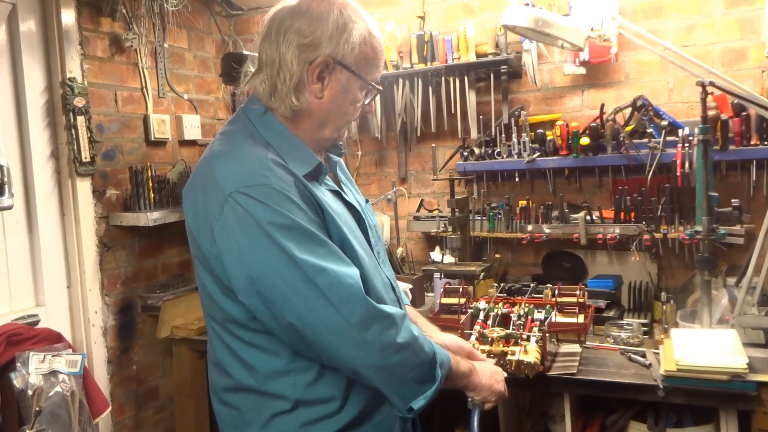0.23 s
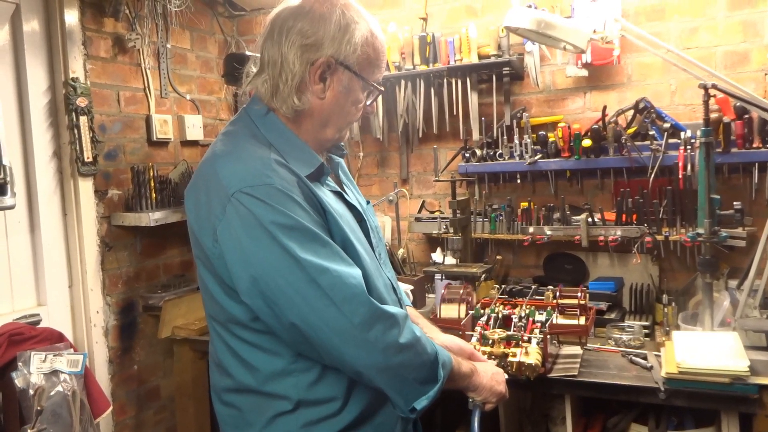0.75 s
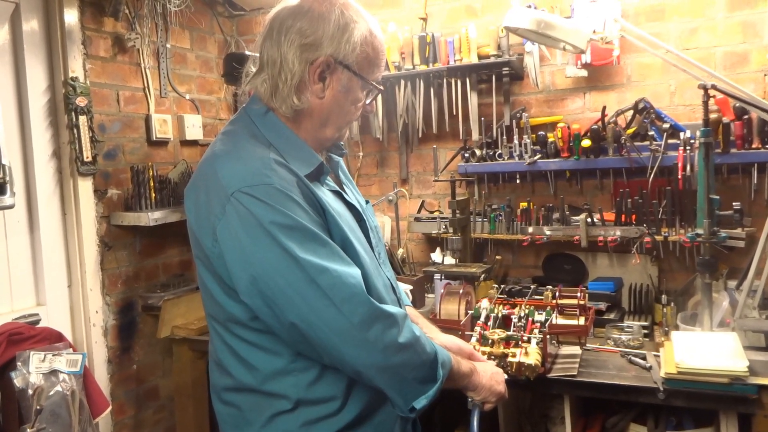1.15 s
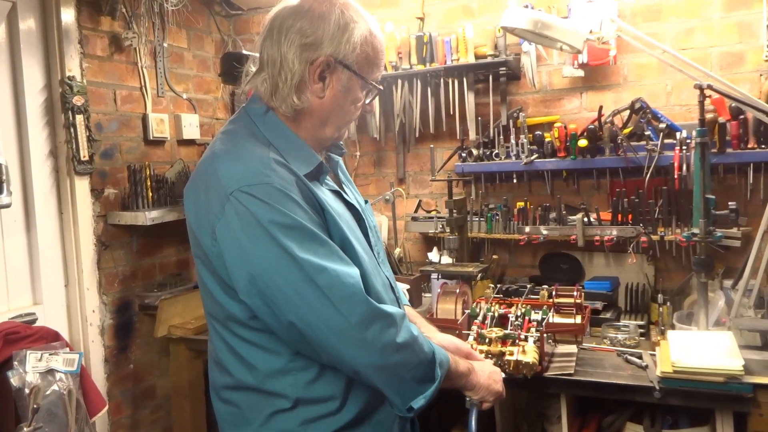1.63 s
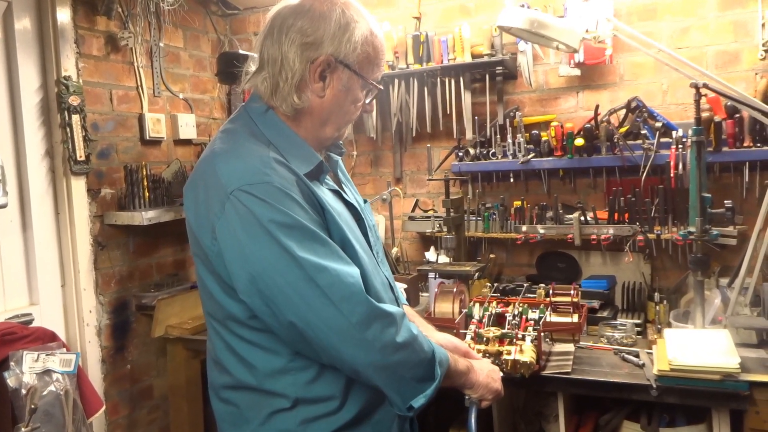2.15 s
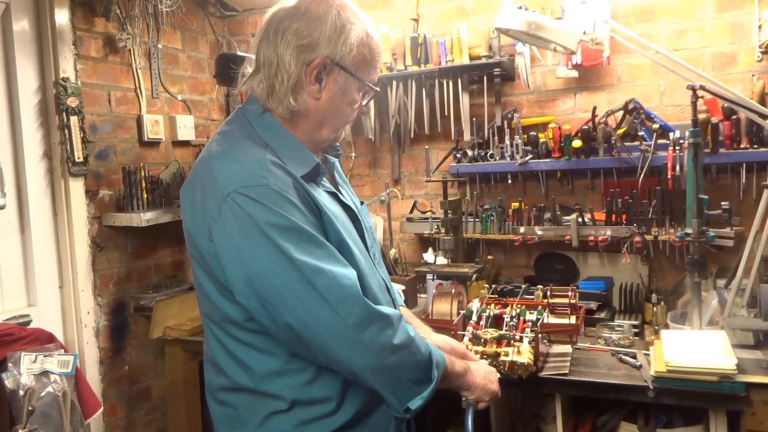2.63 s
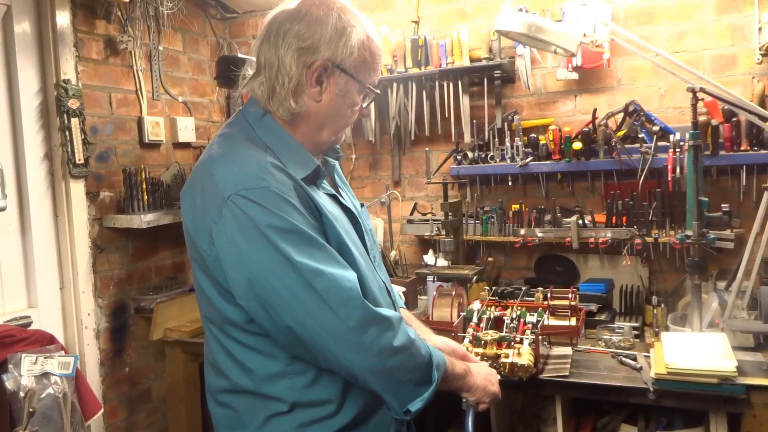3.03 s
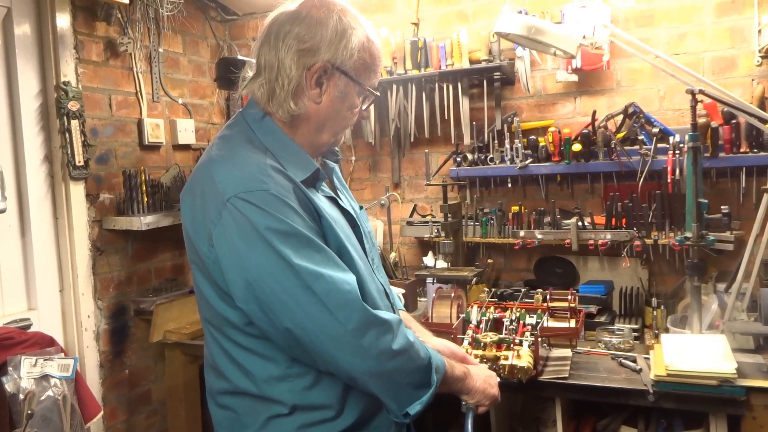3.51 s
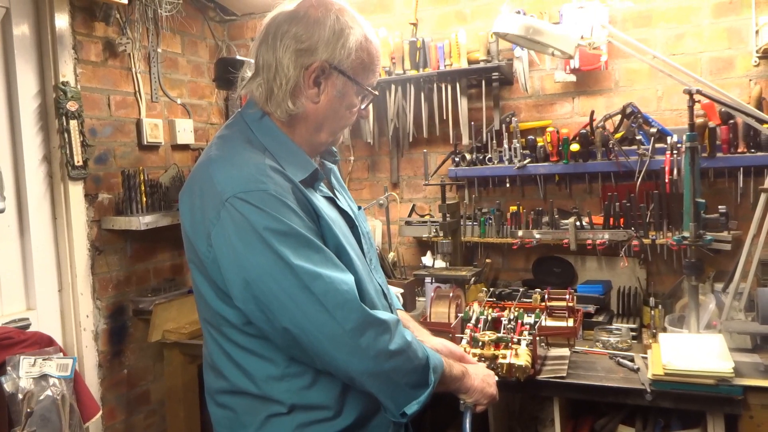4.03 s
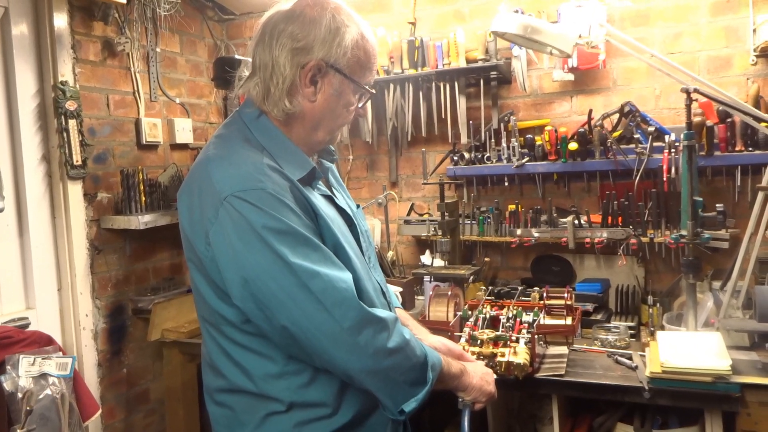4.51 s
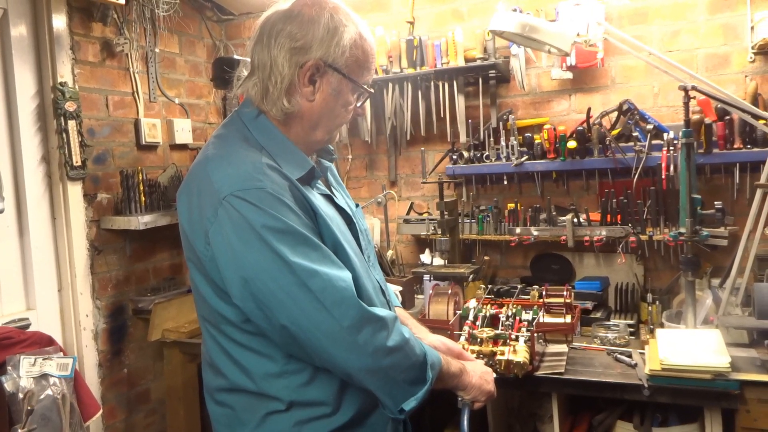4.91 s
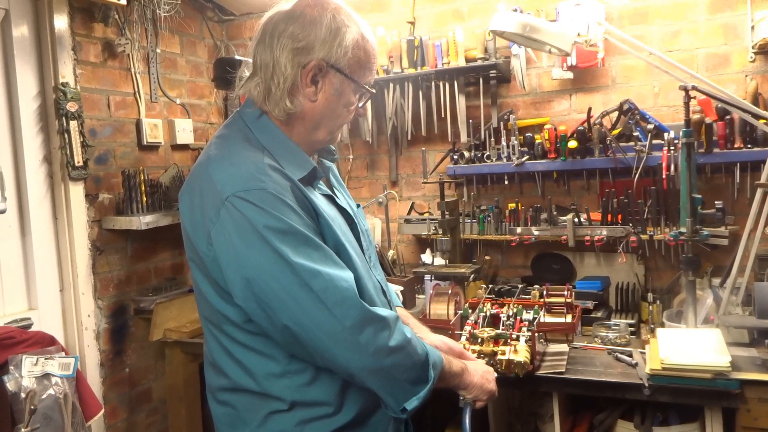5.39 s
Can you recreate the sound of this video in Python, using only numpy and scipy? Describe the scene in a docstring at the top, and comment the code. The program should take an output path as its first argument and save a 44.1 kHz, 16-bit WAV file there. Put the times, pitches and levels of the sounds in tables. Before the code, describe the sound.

A small multi-cylinder model engine on a bench runs on compressed air. First only a faint, uneven leak is heard; then harsh high hiss bursts in, with overlapping quick puffs and fine metal clatter quickly reaching full speed. Hollow fuzzy swells come from the base, with fast high chirps and barely audible dull bench bumps. Close microphone, engine slightly right, short brick-wall reflections, top treble cut off.

```python
"""On a workshop bench, a small multi-cylinder model steam engine is started on compressed air.
A leak sputters over thin steady tones, and weakens to half once the valve opens; then air hisses in quick puffs.
A gap chirps, faintly all along and louder in spells. As the crank runs up to speed, the rods rattle harder
in the metal frame, with a fuzzy tone swelling in its base. The bench bumps dully; close brick walls throw it back.
Filtered noise makes the hiss, random ticks the rattle, and swelling fuzzy tones the base, chirps and bumps."""
import sys
import numpy as np
from scipy import signal
from scipy.fft import rfft, irfft
from scipy.io import wavfile

SR = 44100
rng = np.random.default_rng(int(sys.argv[2]) if len(sys.argv) > 2 else 0)


def int16_out(signal):
    """Quantize to a 16-bit WAV file."""
    q = np.round(np.clip(np.atleast_2d(signal).T, -1, 1) * 32767)
    wavfile.write(sys.argv[1], SR, q.astype(np.int16))


N = 249606
TIME = np.arange(N) / SR


def from_db(db):
    """Turns decibels into a plain gain."""
    return 10 ** (np.asarray(db) / 20)


def rms(x):
    """Average strength of a signal."""
    return np.sqrt(np.mean(x ** 2))


def unit(x):
    """Scales a signal to rms 1."""
    return x / np.sqrt(np.mean(x ** 2) + 1e-20)


def spectrum(rows, hz):
    """Reads a curve of (pitch, value) rows, in straight lines on a log pitch axis."""
    row_hz, value = np.transpose(rows)
    return np.interp(np.log(hz + 1), np.log(row_hz), value)


def add(mix, s, sound):
    """Lays a sound into the mix at time s."""
    part = mix[max(round(s * SR), 0):][:len(sound)]
    part += sound[:len(part)]


def flutter(rate_hz):
    """Smooth random ups and downs of rms 1, up to about this rate."""
    hz = np.fft.rfftfreq(N, 1 / SR)
    smooth = rfft(rng.standard_normal(N)) / (1 + (hz / rate_hz) ** 4)
    return unit(irfft(smooth, N))


def ring(x, db_at, size=8192):
    """Filters with the gain db_at(Hz), never ahead of the input: resonances ring on after it."""
    hz = abs(np.fft.fftfreq(size, 1 / SR))
    log_gain = np.log(from_db(db_at(hz)))
    # the Hilbert transform finds the phase that lets the response start at once
    response = np.fft.ifft(np.exp(np.conj(signal.hilbert(log_gain)))).real[:size // 2]
    return signal.oaconvolve(x, response)[:len(x)]


def whistle(hz, width_hz, length):
    """Noise in one resonance: a fuzzy tone of rms 1."""
    f = np.fft.rfftfreq(length, 1 / SR)
    resonance = 1 / (1 + ((f - hz) / width_hz) ** 2)
    return unit(irfft(rfft(rng.standard_normal(length)) * resonance, length))


def swelling_tone(hz, width_hz, swell):
    """A fuzzy tone that rises and falls, as strong overall as its swell."""
    return unit(whistle(hz, width_hz, len(swell)) * swell) * rms(swell)


def bursts(rows, width_hz, length_s):
    """Short swells of a fuzzy tone, from rows of (middle s, pitch Hz, level dB)."""
    out, swell = np.zeros(N), np.hanning(int(length_s * SR))
    for s, hz, db in rows:
        add(out, s - length_s / 2, from_db(db) * swelling_tone(hz, width_hz, swell))
    return out


# the air valve: when it starts to open, and how long it takes [s]
OPEN_S, TRAVEL_S = 0.448, 0.041


def valve():
    """Opening of the air valve, from 0 (shut) to 1 (open)."""
    return np.clip((TIME - OPEN_S) / TRAVEL_S, 0, 1)


# full speed [turns a second], and the time constant of the run-up [s]
FULL_TURNS_PER_S, RUN_UP_S = 6.8, 0.36


def speed():
    """Share of full speed, 0-1: the flywheel gathers pace once the valve starts to open."""
    return 1 - np.exp(-np.maximum(TIME - OPEN_S, 0) / RUN_UP_S)


def crank(wander=0.06, wander_hz=2.0):
    """Turns of the crankshaft since the start; its pace wanders a little."""
    pace = FULL_TURNS_PER_S * speed() * (1 + wander * flutter(wander_hz))
    return np.cumsum(pace) / SR


# strength of the workshop's reflections: (pitch [Hz], gain [dB])
WALL_REFLECTIONS = [(60, -11), (280, -5), (700, -6), (1500, -6.5), (5000, -10), (9000, -12.5)]


def workshop(x, t60_s=0.15, delay_s=0.0035):
    """Close walls send back a short tail of sparse reflections, different on the left and right."""
    t = np.arange(SR // 3) / SR
    sparse = rng.random((2, len(t))) < 1 / 10
    taps = rng.standard_normal((2, len(t))) * sparse * (t > delay_s)
    taps *= from_db(-60 * t / t60_s)
    taps /= np.linalg.norm(taps, axis=1, keepdims=True)
    gain = from_db(spectrum(WALL_REFLECTIONS, np.fft.rfftfreq(len(t), 1 / SR)))
    tail = irfft(rfft(taps) * gain, len(t))
    return signal.fftconvolve(x[None], tail, axes=1)[:, :N]


# faint steady tones of the air supply: (pitch [Hz], relative level [dB])
SUPPLY_TONES = [(543.7, -71.5), (694.4, -74.5), (4398, -67.5)]


def hum():
    """Thin tones of the air supply: plain sine waves that never change."""
    return sum(from_db(db) * unit(np.sin(2 * np.pi * (hz * TIME + rng.random()))) for hz, db in SUPPLY_TONES)


# colour of the leak's hiss: (pitch [Hz], relative level [dB])
LEAK_COLOUR = [(35, -42), (150, -38), (330, -21), (400, -19.5), (531, -10), (632, -13), (1020, -6.5),
               (1200, -13.5), (1700, -9.5), (1920, -14.5), (3040, -13), (3700, -16), (4310, -17),
               (5470, -17), (6110, -9), (6660, -14.5), (11000, -9.5), (14300, -47)]
# whistles of the leak: (pitch [Hz], width [Hz], relative level [dB])
LEAK_TONES = [(1344, 40, -63.5), (3050, 100, -65.5), (4380, 45, -70), (6150, 120, -61.5)]


def leak(hiss_db=-53, sputter_db=0.4, sputter_hz=60, waver_db=4.5, waver_hz=25):
    """Air escapes from the supply line with a faint sputtering hiss and unsteady whistles."""
    air = from_db(hiss_db) * unit(ring(rng.standard_normal(N), lambda hz: spectrum(LEAK_COLOUR, hz)))
    for hz, width_hz, db in LEAK_TONES:
        waver = from_db(waver_db * flutter(waver_hz))
        air += from_db(db) * unit(whistle(hz, width_hz, N) * waver)
    sputter = unit(from_db(sputter_db * flutter(sputter_hz)))
    # once the valve is open the air takes the easier way through the engine: the leak weakens to half
    return air * sputter * (1 - 0.5 * valve())


# dull bumps of the bench: (middle [s], pitch [Hz], relative level [dB])
BENCH_BUMPS = [(1.49, 280, -64), (2.95, 272, -55), (3.21, 257, -66)]


def bench():
    """The bench bumps dully: each bump is a short, low, narrow tone."""
    rows = [(s, hz, db - 4) for s, hz, db in BENCH_BUMPS]
    return bursts(rows, width_hz=13, length_s=0.11)


# spells of louder chirps: (first chirp [s], last chirp [s], middle pitch [Hz], middle level [dB])
CHIRP_SPELLS = [(0.757, 0.846, 6590, -29.5), (1.724, 1.878, 5730, -32.5), (2.45, 2.792, 5690, -31),
                (2.981, 2.99, 5500, -27.5), (4.722, 4.879, 5740, -33), (5.059, 5.23, 5610, -31),
                (5.542, 5.55, 5620, -30.5)]
# pace [s], and the random scatter of pitch [Hz] and level [dB] from chirp to chirp
CHIRP_EVERY_S, CHIRP_SCATTER_HZ, CHIRP_SCATTER_DB = 0.085, 70, 1.5
# the faint chirps: middle level [dB], middle pitch [Hz], how far that pitch drifts [Hz]
FAINT_DB, FAINT_HZ, FAINT_DRIFT_HZ = -37.5, 5910, 280


def chirps(drift_hz=1.34):
    """Air chirps through a gap at an even pace, faintly at a drifting pitch and louder in spells."""
    rows = []
    for first, last, hz, db in CHIRP_SPELLS:
        count = 1 + round((last - first) / CHIRP_EVERY_S)
        rows += [(s, hz, db) for s in np.linspace(first, last, count)]
    drift = FAINT_HZ + FAINT_DRIFT_HZ * flutter(drift_hz)
    for s in np.arange(OPEN_S + CHIRP_EVERY_S, TIME[-1], CHIRP_EVERY_S):
        rows.append((s, np.interp(s, TIME, drift), FAINT_DB))
    # no two chirps are quite alike
    scatter = rng.standard_normal((len(rows), 2)) * [CHIRP_SCATTER_HZ, CHIRP_SCATTER_DB]
    uneven = [(s, hz + more_hz, db + more_db) for (s, hz, db), (more_hz, more_db) in zip(rows, scatter)]
    return bursts(uneven, width_hz=100, length_s=0.085)


# stronger swells of a fuzzy tone near 620 Hz within the rattle: (time [s], relative level [dB])
STRONG_SWELLS = [(1.27, -39), (1.897, -40), (2.02, -37.5), (2.176, -38.5), (2.274, -39), (2.6, -37.5),
                 (2.764, -37.5), (3.04, -45), (3.66, -39.5), (3.887, -38.5), (4.138, -41), (4.328, -37),
                 (4.57, -38), (4.699, -38.5)]
# lowest mode of the engine's base [Hz]
BASE_HZ = 620


def base_swells(turns, light_db=-56.5, spread_db=4.0, width_hz=28, rise_s=0.01401, count=2):
    """A fuzzy tone in the base's lowest mode: a light swell each half turn, and stronger ones at set times."""
    out, t = np.zeros(N), np.arange(SR // 8) / SR
    swell = t / rise_s * np.exp(1 - t / rise_s)
    at = np.flatnonzero(np.diff(np.floor(count * turns)) > 0)
    # light swells grow with the square of the speed
    light = light_db + 40 * np.log10(speed()[at] + 1e-6) + spread_db * rng.standard_normal(len(at))
    strong = [(s, db - 9) for s, db in STRONG_SWELLS]
    for s, db in strong + list(zip(TIME[at], light)):
        add(out, s - rise_s / 2, from_db(db) * swelling_tone(BASE_HZ, width_hz, swell))
    return out


# broad colour of the running engine: (pitch [Hz], relative level [dB])
ENGINE_COLOUR = [(30, -61), (85, -49.5), (130, -57), (200, -48.5), (270, -39.5), (450, -40.5), (580, -24.5),
                 (900, -24), (1500, -14), (2700, -9.5), (4500, -8), (7300, -7), (8600, 1), (9600, -8.5),
                 (11000, -2)]
# resonances of the frame: (pitch [Hz], width [Hz], level over the broad colour [dB])
FRAME_RESONANCES = [(625.7, 47, 8.5), (846, 29, 5), (1059, 112, 8.5), (1227, 23, 4.5), (1342, 50, 2.5),
                    (1494, 51, 2.5), (1762, 93, -1), (1961, 100, 8.5), (2221, 77, 3.5), (2401, 61, 9.5),
                    (2486, 71, 6), (2850, 30, 2.5), (3043, 93, 7.5), (3222, 125, 6), (3534, 170, 2),
                    (3692, 48, 0), (3880, 106, 6), (4120, 62, 9.5), (4356, 61, 9), (4455, 160, 4),
                    (4640, 49, 7), (5050, 165, 7.5), (5540, 170, 4), (5850, 32, -1), (5800, 161, -5),
                    (6150, 58, 5.5), (6150, 59, -17), (6530, 36, 7), (7020, 200, 3.5), (7228, 37, -2)]
# resonances of the exhaust ports: (pitch [Hz], width [Hz], level over the broad colour [dB])
PORT_RESONANCES = [(7497, 161, 3.5), (7631, 32, 2.8), (7819, 45, 5.1), (7970, 87, 7.2), (8400, 230, 6.3),
                   (8733, 43, 7.0), (8835, 74, 13.3), (8944, 36, 9.3), (9042, 82, 10.0), (9140, 74, 12.2),
                   (9340, 204, 10.5), (9490, 37, 13.6), (9571, 84, 12.2), (9820, 260, 9.1),
                   (9975, 76, 10.0), (10080, 47, 6.6), (10274, 260, 3.1), (10837, 68, 2.5)]


def engine_db(hz):
    """Gain of the engine's body: resonances standing on a broad colour."""
    centre, width, db = np.transpose(FRAME_RESONANCES + PORT_RESONANCES)
    peaks = from_db(db) / (1 + (2 * (hz[:, None] - centre) / width) ** 2)
    return spectrum(ENGINE_COLOUR, hz) + 10 * np.log10(1 + (peaks ** 2).sum(1))


# rattle: level at full speed [dB], and the change from that as the crank starts [dB]
RATTLE_DB, RATTLE_START_DB = -30.5, -8.5


def rods(turns, ticks_per_s=1200, spread_db=2.0, stroke_db=0.76, uneven_db=1.24, uneven_hz=20,
         rub=0.11, corner_hz=3400, count=7):
    """Joints tick in clusters as strokes reverse, over the rub of the slides; both ring the frame, harder with speed."""
    strength = from_db(spread_db * np.minimum(rng.exponential(1, N), 3))
    ticks = (rng.random(N) < ticks_per_s / SR) * rng.choice([-1, 1], N) * strength
    strokes = from_db(stroke_db * np.cos(2 * np.pi * count * turns))
    force_db = RATTLE_DB + RATTLE_START_DB * (1 - speed()) + uneven_db * flutter(uneven_hz)
    force = from_db(force_db) * valve()
    drive = (ticks + rub * rng.standard_normal(N)) * strokes * force

    def colour(hz):
        # the treble falls away above the corner
        return engine_db(hz) - 20 * np.log10(1 + (hz / corner_hz) ** 2)

    return rms(force) * unit(ring(drive, colour))


def exhaust(turns, air_db=-17.0, puff_db=0.54, sputter_db=0.85, sputter_hz=260, corner_hz=2900, count=4):
    """Air leaves in overlapping puffs, several a turn, made ragged by oil in the ports; the jet is mostly treble."""
    puffs_db = puff_db * np.cos(2 * np.pi * count * turns)
    flow = from_db(air_db + puffs_db + sputter_db * flutter(sputter_hz)) * valve()

    def colour(hz):
        # the bass falls away below the corner
        return engine_db(hz) - 10 * np.log10(1 + (corner_hz / (hz + 20)) ** 2)

    return rms(flow) * unit(ring(flow * rng.standard_normal(N), colour))


def scene():
    """The engine stands slightly to the right, with the workshop's reflections around it."""
    turns = crank()
    background = hum() + leak() + bench()
    engine = chirps() + base_swells(turns) + rods(turns) + exhaust(turns)
    dry = background + engine
    left_right_db = [[-0.5], [0.45]]
    return dry * from_db(left_right_db) + workshop(dry)


def record(dry, edge_hz=11050):
    """A steep low-pass filter takes away the treble above its edge."""
    low_pass = signal.firwin(1201, edge_hz, window=("kaiser", 9), fs=SR)
    return signal.oaconvolve(dry, low_pass[None], "same", axes=1)


dry = scene()
out = record(dry)
int16_out(out)
```